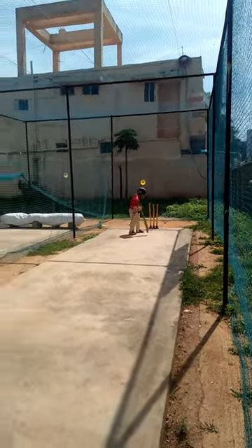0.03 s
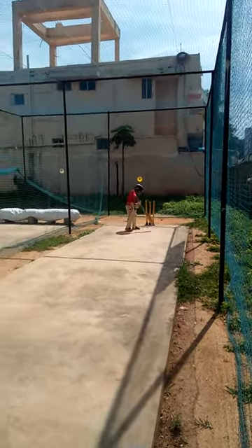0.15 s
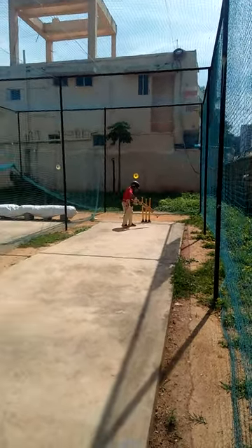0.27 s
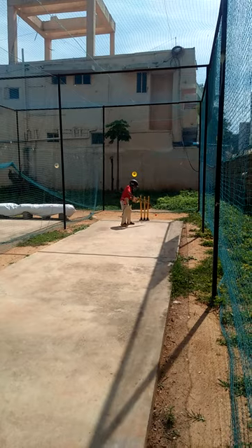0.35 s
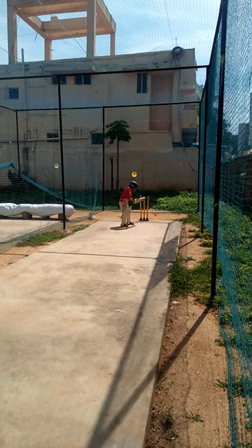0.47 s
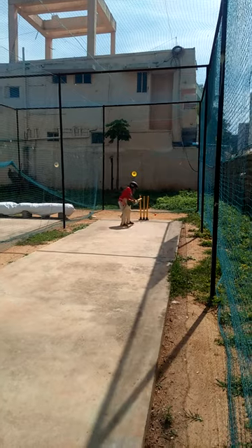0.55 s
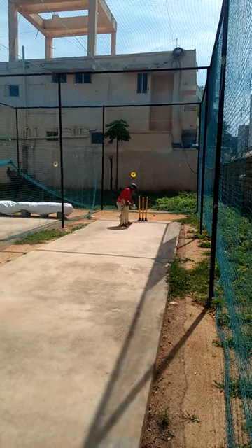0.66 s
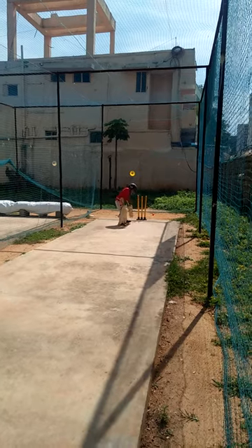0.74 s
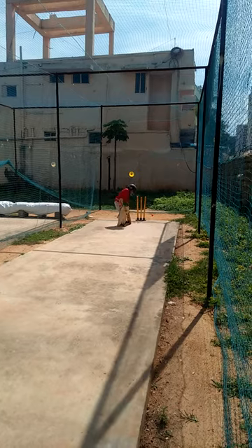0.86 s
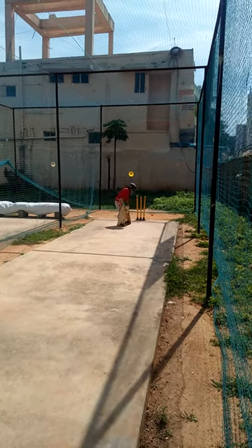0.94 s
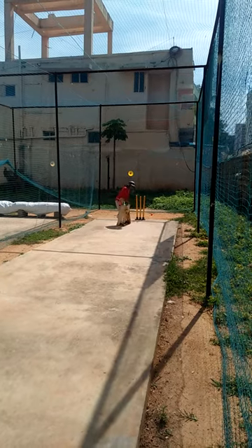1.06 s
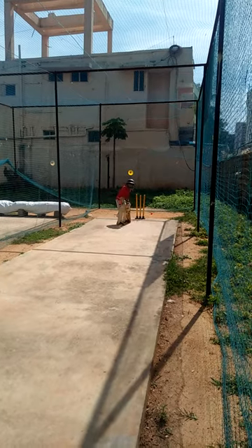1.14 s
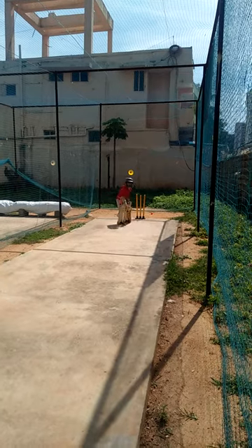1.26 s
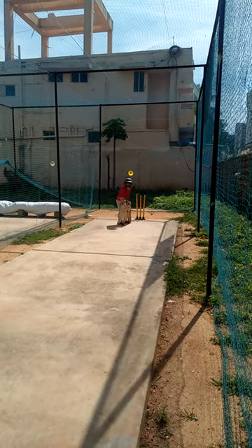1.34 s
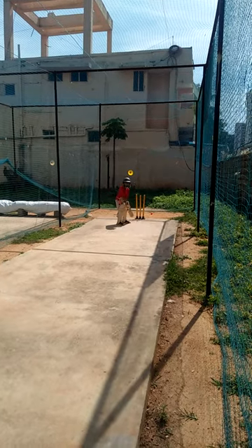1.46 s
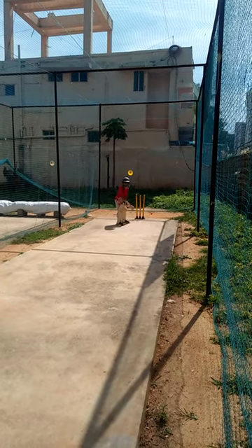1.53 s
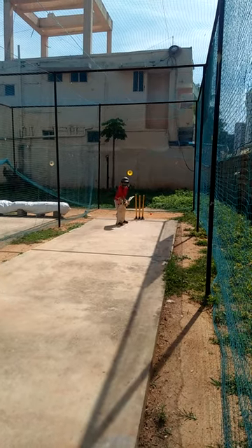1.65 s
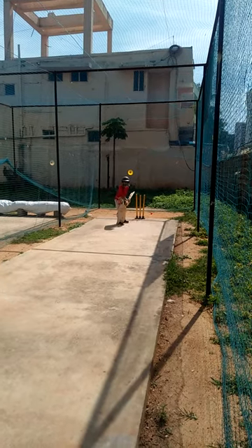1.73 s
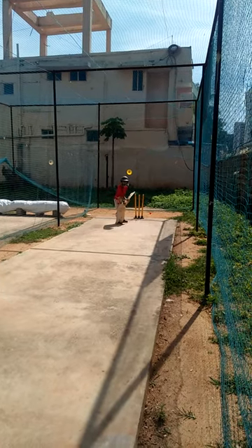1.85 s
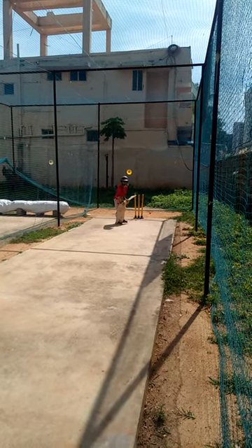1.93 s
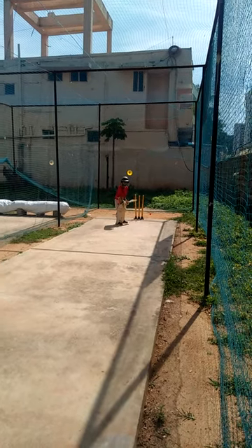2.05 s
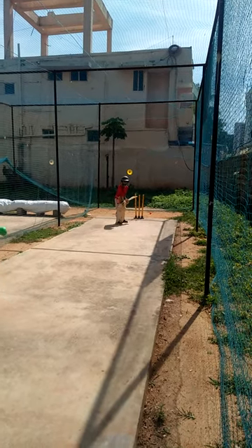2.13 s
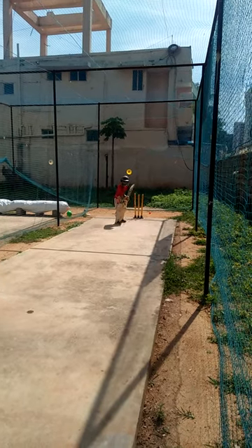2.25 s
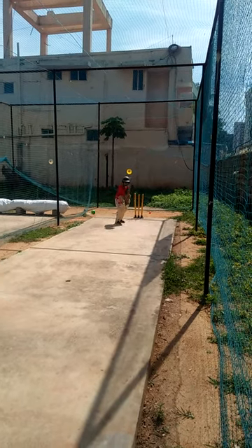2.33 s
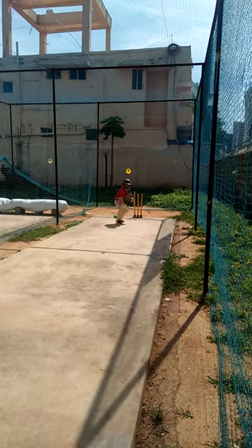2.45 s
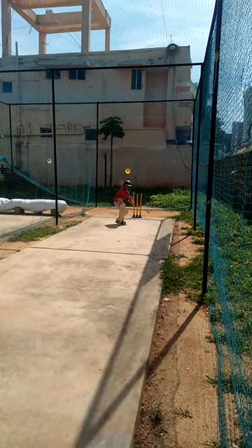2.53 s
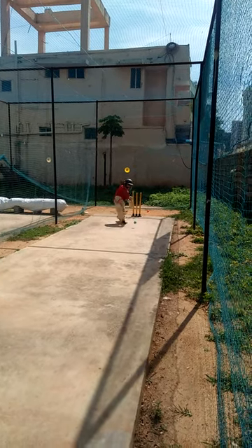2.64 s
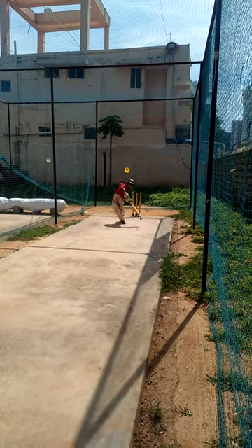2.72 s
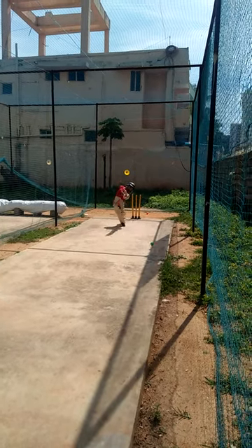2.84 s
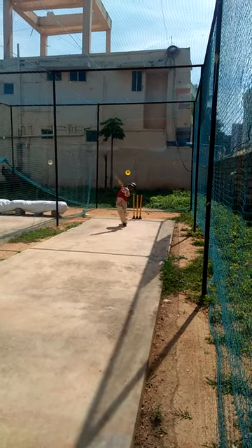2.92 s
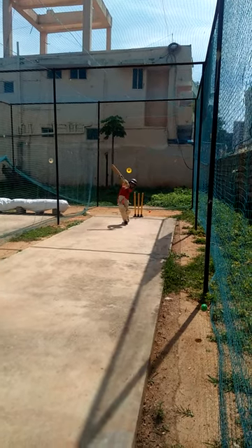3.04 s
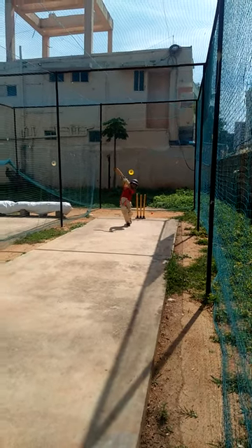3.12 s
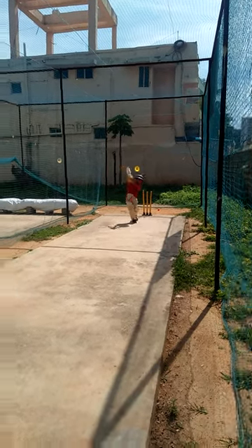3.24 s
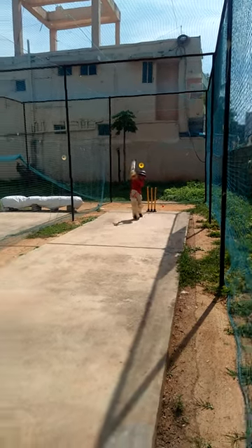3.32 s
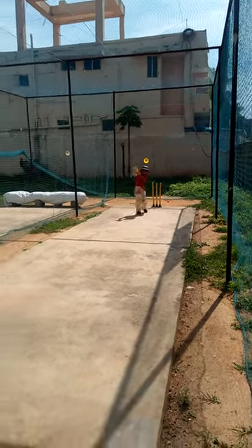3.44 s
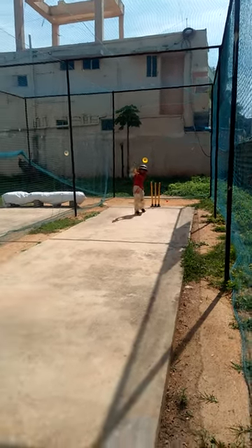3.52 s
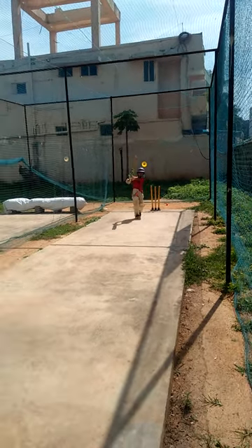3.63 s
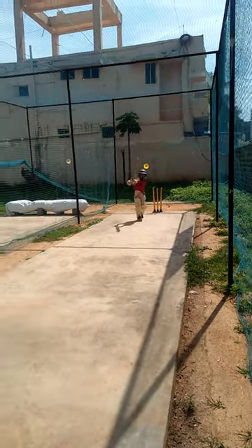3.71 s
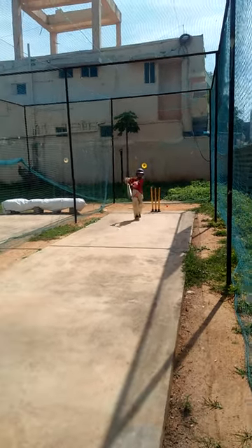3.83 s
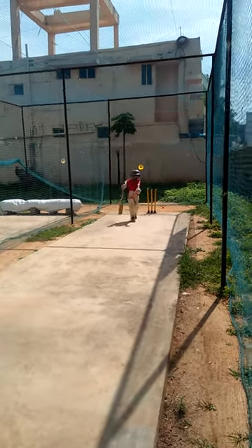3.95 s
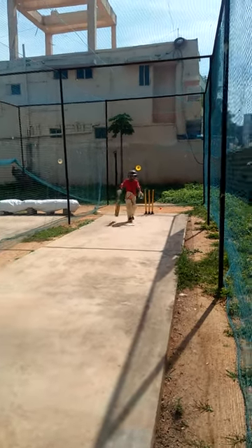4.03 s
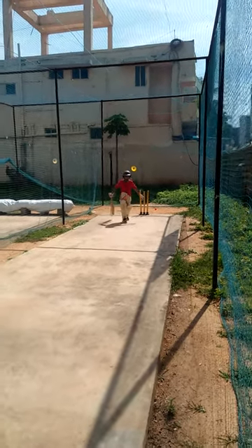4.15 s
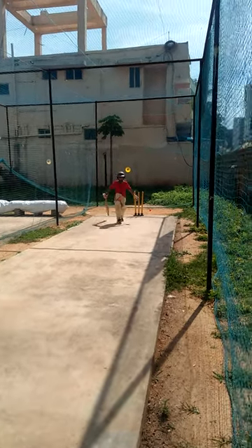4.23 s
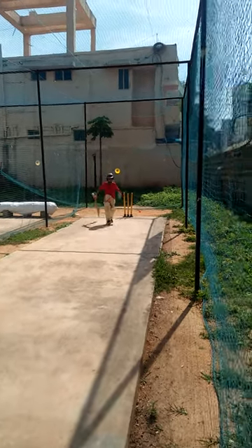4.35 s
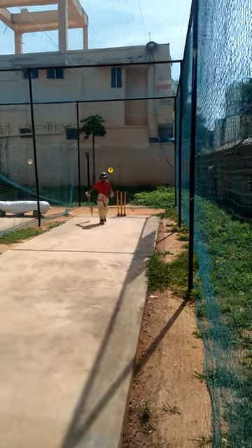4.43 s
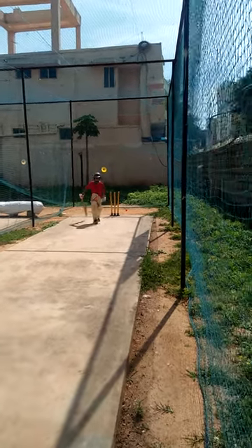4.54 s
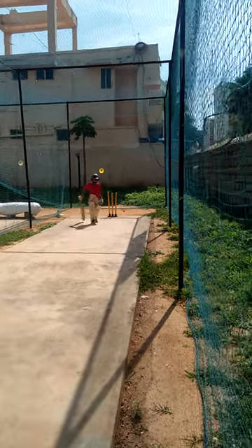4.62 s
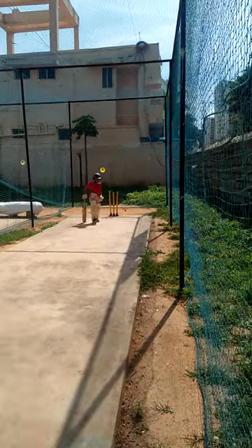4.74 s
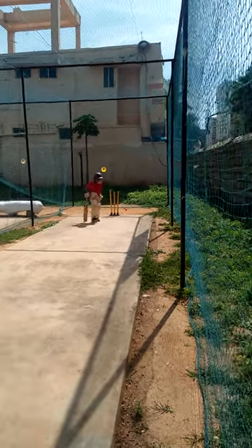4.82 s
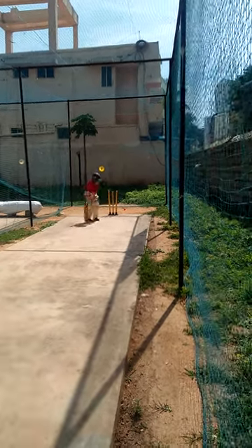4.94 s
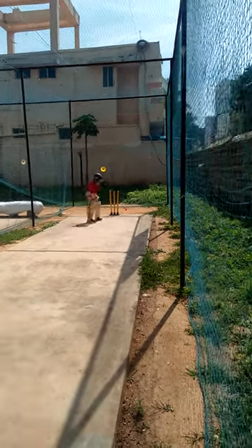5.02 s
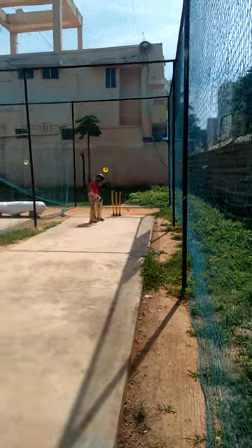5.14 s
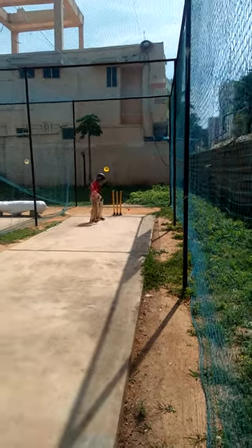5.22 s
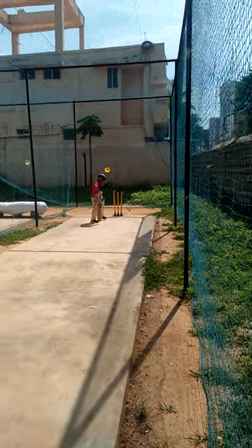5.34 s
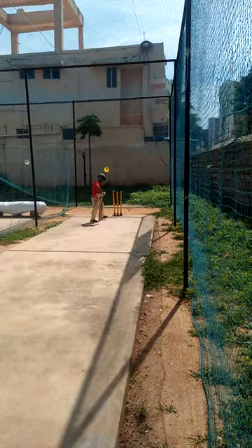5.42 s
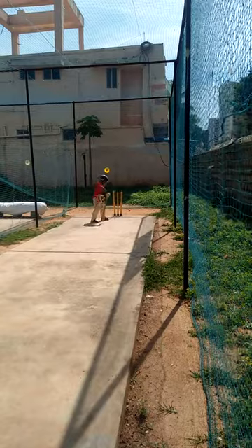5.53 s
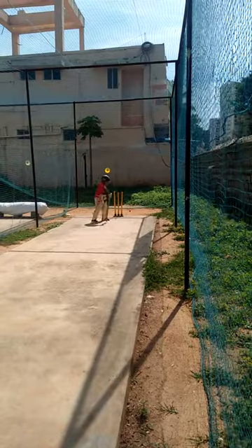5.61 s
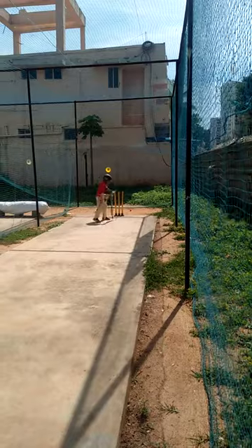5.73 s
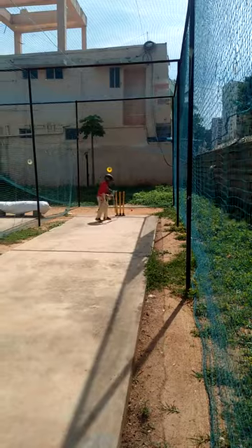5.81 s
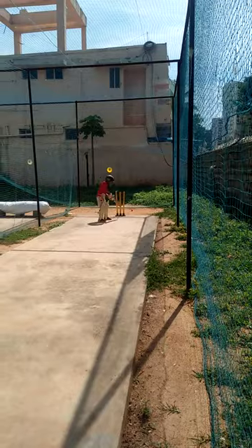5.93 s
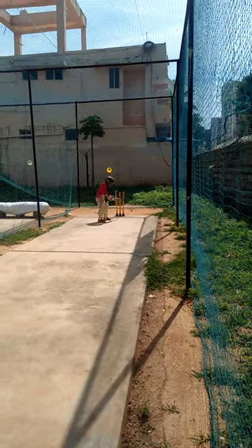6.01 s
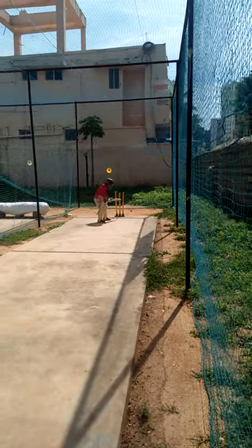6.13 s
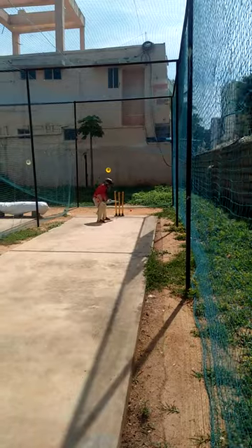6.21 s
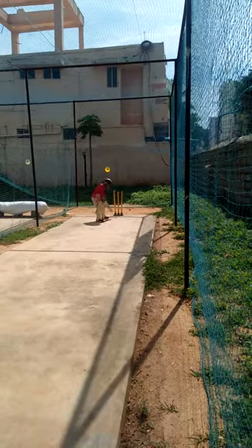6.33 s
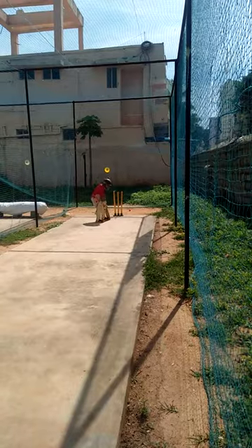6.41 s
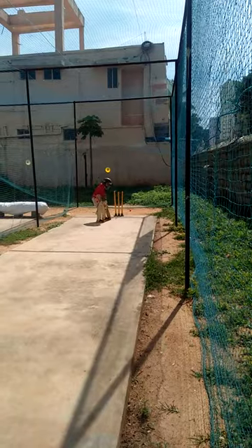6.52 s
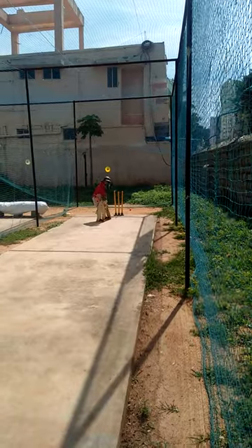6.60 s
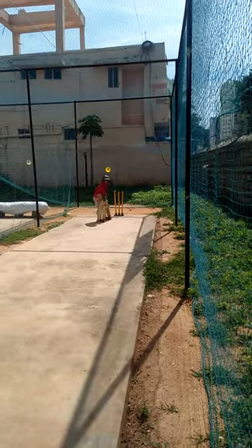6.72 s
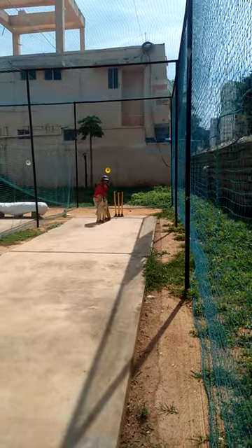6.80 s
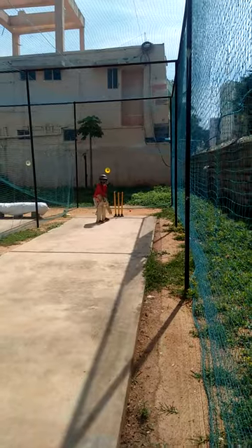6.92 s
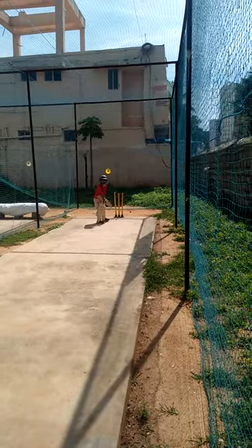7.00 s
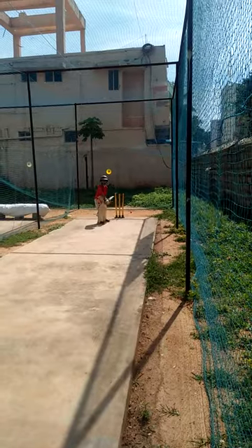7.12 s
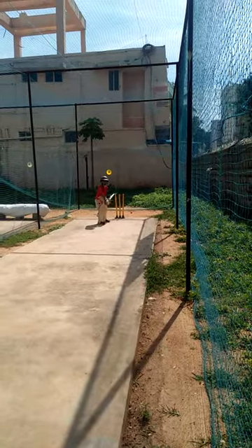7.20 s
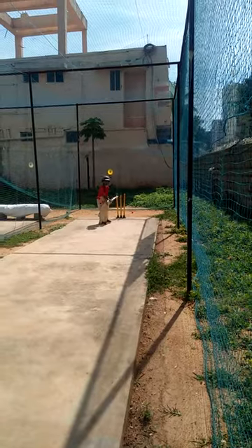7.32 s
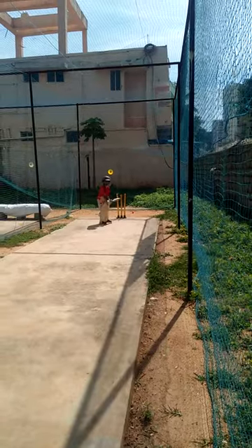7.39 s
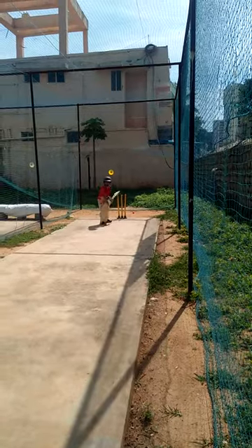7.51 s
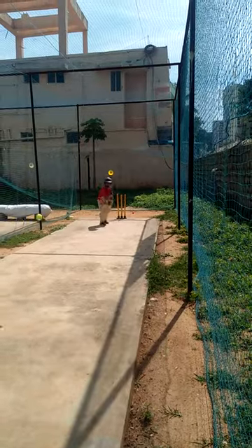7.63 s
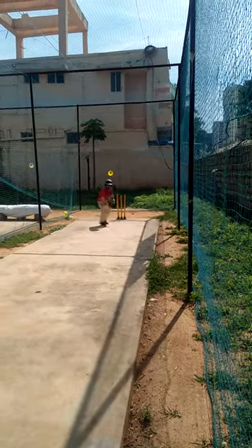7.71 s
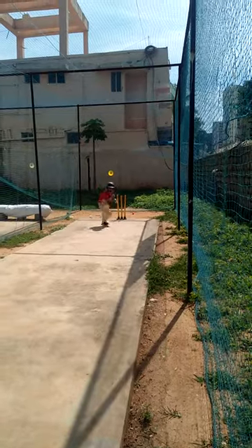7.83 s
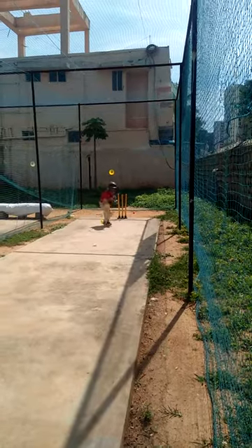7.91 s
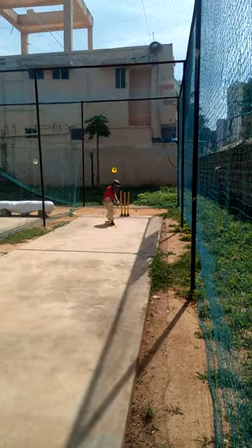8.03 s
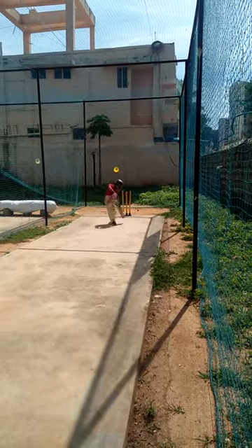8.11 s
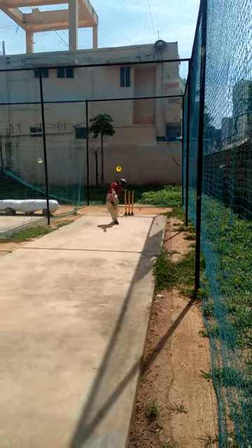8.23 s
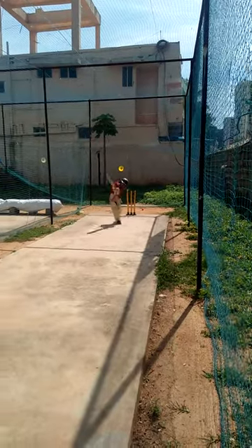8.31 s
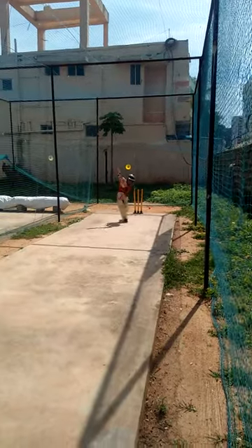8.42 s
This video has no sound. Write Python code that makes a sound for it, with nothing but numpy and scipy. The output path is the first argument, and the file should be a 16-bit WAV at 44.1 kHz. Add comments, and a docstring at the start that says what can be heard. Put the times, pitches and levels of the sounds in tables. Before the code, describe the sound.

Wooden bat taps and two sharp cricket shots on concrete, the first ball swishing into netting, while feet scuff grit and an insect chirps over faint town hum.

```python
"""Bat taps, shuffling feet and two sharp cricket shots on a concrete strip in an outdoor net, heard close to.
Each shot follows a ball that has just pitched; the first swishes into netting, which swings and ticks.
An insect chirps over the faint hum of the town. Bat, ball and small knocks are fading tones and noise bursts,
with echoes from nearby things and a house wall; feet, netting and town are coloured noise whose level
rises and falls; the insect is made of short falling tones."""
import sys
import numpy as np
from scipy import signal
from scipy.fft import rfft, irfft
from scipy.io import wavfile
from scipy.ndimage import uniform_filter1d

SR = 44100
rng = np.random.default_rng(int(sys.argv[2]) if len(sys.argv) > 2 else 0)


def put_to_file(sound):
    """Save the sound as 16-bit audio at rate SR, in the file named by the first command-line argument."""
    columns = np.atleast_2d(sound).T  # one column per channel
    safe = np.clip(columns, -1, 1)
    whole_steps = np.round(safe * 32767)
    wavfile.write(sys.argv[1], SR, whole_steps.astype(np.int16))


N = 373086

# bat blows, toe taps and shots: (time [s], level [dB], pitch that places the push's band [Hz],
# crack level [dB], scatter level [dB], wall echo setting, lowered again in yard() [dB])
BLOWS = [(0.964, -4.5, 716, -39.5, -16.5, -25), (2.8658, -2.5, 1380, -4, -3, -5),
         (6.557, -3.5, 800, -38, -14, -21.5), (8.2842, -6, 1310, -6, -4.5, -12)]
# colour of crunching grit: (frequency [Hz], relative level [dB])
GRIT = [(1500, -16), (3000, -11.5), (4500, -17), (5800, -9), (6800, 2.5), (8000, -2), (9600, 3.5),
        (11500, -5.5), (14000, -9.5)]
T = np.arange(N) / SR  # time through the scene (s)
AGE = T[:SR // 2]  # time since a short sound began (s)
# echo delays off the nearest surface, and off the house wall for the bat and for the ball's bounce (s)
CLOSE_S, WALL_S, BOUNCE_WALL_S = 0.0054, 0.0595, 0.065


def undb(db):
    """Turn decibels into a plain multiplier."""
    return 10 ** (np.asarray(db) / 20)


def unit(x):
    """Scale to an rms (average strength) of 1."""
    return x / np.sqrt(np.mean(x ** 2))


def add(track, s, sound):
    """Mix a sound into the track at s seconds."""
    start = max(int(s * SR), 0)
    part = track[start:start + len(sound)]
    part += sound[:len(part)]


def fade(t60):
    """Die away smoothly, falling by 60 dB in t60 seconds."""
    return np.exp(-np.log(1000) * AGE / t60)


def delay(x, s):
    """The same sound s seconds later."""
    silence = np.zeros(int(abs(s) * SR))
    return np.concatenate([silence, x])[:len(x)]


def cut(x, hz, kind, order=2):
    """Keep what lies below hz ("low") or above it ("high")."""
    sos = signal.butter(order, min(hz, SR / 2 - 1), kind, fs=SR, output="sos")
    return signal.sosfilt(sos, x)


def noise(spectrum, size=N):
    """Noise of rms 1 with the given colour."""
    hz, db = np.transpose(spectrum)
    f = np.maximum(np.fft.rfftfreq(size, 1 / SR), 1)
    colour = undb(np.interp(np.log(f), np.log(hz), db))
    return unit(irfft(rfft(rng.standard_normal(size)) * colour, size))


def walk(rate, size=N):
    """Smooth random wander of rms 1, with about rate new values a second."""
    k = max(int(SR / rate), 1)
    steps = np.repeat(rng.standard_normal(size // k + 1), k)
    return unit(uniform_filter1d(steps, k)[:size])


def ring(modes):
    """A struck object: fading pure tones added together, scaled to peak 1."""
    y = sum(undb(db) * np.sin(2 * np.pi * hz * AGE) * fade(t60) for hz, db, t60 in modes)
    return y / np.abs(y).max()


def crack(t60):
    """The brief bright burst of a hard contact: noise with a quick start and a fade."""
    # (frequency [Hz], relative level [dB])
    crack_colour = [(300, -10), (1600, 4.5), (2600, -7.5), (3700, -17), (4600, -5.5), (6200, -7.5),
                    (7400, -1.5), (9500, 0), (11000, -7.5), (13000, -11), (15000, -22)]
    return noise(crack_colour, size=len(AGE)) * fade(t60) * (1 - fade(0.0018))


def cloud(t60, top_hz):
    """A cluster of reflections of uneven strength, scaled by its fade time and duller above top_hz."""
    uneven = unit(undb(3.5 * walk(350, size=len(AGE))))
    y = cut(uneven * rng.standard_normal(len(AGE)), top_hz, "low", order=1) * fade(t60)
    return y / np.sqrt(SR * t60 / (2 * np.log(1000)))


def yard(x, scatter_db, wall_db, wall_s=WALL_S):
    """One close reflection, thin scatter from poles and ground, the house wall's slap and a faint tail."""
    near = undb(scatter_db) * delay(cloud(t60=0.1, top_hz=4940), 0.004)
    wall = undb(wall_db - 2) * delay(cloud(t60=0.06, top_hz=3500), wall_s)
    tail = undb(scatter_db - 6) * delay(cloud(t60=0.72, top_hz=2980), 0.02)
    scatter = cut(signal.fftconvolve(x, near + wall + tail)[:len(x)], 410, "high")
    slap = undb(wall_db - 6.5) * cut(delay(x, wall_s), 3880, "low", order=1)
    return x + undb(-8.5) * delay(x, CLOSE_S) + slap + scatter


def bat():
    """A toe tap is a slow push into the blade; the ball gives a quick push and a crack."""
    # the willow blade's tones: (frequency [Hz], relative level [dB], time to fade by 60 dB [s])
    blade_modes = [(611.4, -12.5, 0.097), (750, -17.5, 0.073), (863, 5, 0.008), (1030, -10, 0.041),
                   (1133, -12, 0.029), (1434, 0, 0.015), (1870, -18, 0.016)]
    out = np.zeros(N)
    for s, db, push_hz, crack_db, scatter_db, wall_db in BLOWS:
        body = cut(ring(blade_modes), 2.37 * push_hz, "low", order=4)
        body = cut(body, 0.8 * push_hz, "high", order=3)
        thump = undb(-28.5) * cut(ring([(175, 0, 0.028)]), 90, "high")  # the handle flexes
        sand = undb(-48.0) * noise(GRIT, size=len(AGE)) * fade(0.073)  # dust on the wood crunches
        wood = undb(db) * (body / np.abs(body).max() + thump)
        hit = wood + undb(crack_db) * crack(t60=0.0073) + sand
        add(out, s, yard(hit, scatter_db, wall_db))
        add(out, s - 0.0062, soft_onset(db - 14.0))
        # the wall echo also begins with a faint dull onset
        add(out, s + WALL_S - 0.007, undb(db - 26) * knock(387))
        # a hard shot carries a low thud
        low_thud = ring([(58, 0, 0.11), (140, -4, 0.08)])
        add(out, s, undb(crack_db - 38.5) * low_thud)
    return out


def ball():
    """The ball pitches on concrete: a hollow thud, a crack and a short rough ping that sags in pitch."""
    # (time [s], thud level [dB], crack level [dB], pitch the ping sags to [Hz],
    # ping setting before its fades [dB], scatter level [dB])
    bounces = [(2.7808, -27, -15.5, 4440, -13.5, -2), (8.1912, -19.5, -17.5, 4410, -26.5, -1),
               (8.3332, -32, -7, 5530, -25, -5)]
    # the ball's shell: (frequency [Hz], relative level [dB], time to fade by 60 dB [s])
    shell_modes = [(960, -3, 0.0073), (1440, 0.5, 0.017), (2002, -1, 0.0082)]
    out = np.zeros(N)
    for s, thud_db, crack_db, ping_hz, ping_db, scatter_db in bounces:
        roughness = 0.2 * rng.standard_normal(len(AGE))
        hz = ping_hz * (1 + 0.07 * fade(0.012) + roughness)
        tone = np.sin(2 * np.pi * np.cumsum(hz) / SR)
        ping = undb(ping_db) * tone * fade(0.022) * (1 - fade(0.006))
        hit = undb(thud_db) * ring(shell_modes) + undb(crack_db) * crack(t60=0.011)
        echoed = yard(hit + undb(-7.5) * ping, scatter_db, wall_db=-11, wall_s=BOUNCE_WALL_S)
        add(out, s, echoed + ping)
        # the hard wall returns the crack bright
        add(out, s + BOUNCE_WALL_S, undb(crack_db - 18) * tick())
        add(out, s - 0.0062, soft_onset(thud_db - 10.0))
    return out


def shuffling():
    """Each move of the feet swells and fades: the sole scrapes low, sand hisses high."""
    # steps and shuffles, plus the gritty hiss trailing the first tap (row at 1.02 s): (middle [s], half length
    # of the power swell [s], # grit hiss level [dB], sole scrape level before its catches [dB])
    scuffs = [(0.185, 0.033, -66, -87), (1.02, 0.088, -68.5, -56.5), (1.95, .13, -74.5, -72.5),
              (2.3, 0.049, -87, -55), (2.38, 0.063, -62.5, -57.5), (2.69, 0.029, -50, -72),
              (3.871, 0.013, -56.5, -55.5), (5.305, 0.074, -65, -55.5), (5.67, 0.044, -65, -59),
              (6.255, 0.032, -60.5, -74), (6.364, .056, -69, -68.5), (6.997, 0.037, -63.5, -56),
              (7.102, 0.023, -67, -53), (7.28, 0.018, -64.5, -68), (7.567, 0.025, -52, -62.5)]
    # colour of the scraping sole: (frequency [Hz], relative level [dB])
    sole_colour = [(150, -17.5), (350, -7.5), (520, -2), (850, -3.5), (1400, -15.5), (2500, -22),
                   (5000, -33.5)]
    # the feet turn after each blow, the more the harder it cracks
    pivot_lag_s, pivot_half_s = 0.112, 0.087
    pivot_grit_db, pivot_sole_db = -46, -64.5  # relative to the crack
    pivots = [(s + pivot_lag_s, pivot_half_s, crack_db + pivot_grit_db, crack_db + pivot_sole_db)
              for s, _, _, crack_db, _, _ in BLOWS]
    moves = list(scuffs) + pivots
    fidget = undb(-89.5 + 5 * walk(7.5))  # he never stands quite still
    grit_power = fidget ** 2 + sum(undb(db) ** 2 * swell(s, half) for s, half, db, _ in moves)
    sole_power = sum(undb(db) ** 2 * swell(s, half) for s, half, _, db in moves)
    grains = undb(3.1 * walk(700) + 2 * walk(48))
    catches = undb(2.2 * walk(90))
    hiss = np.sqrt(grit_power) * unit(grains * noise(GRIT))
    scrape = np.sqrt(sole_power) * catches * noise(sole_colour)
    return hiss + scrape


def netting():
    """The ball slides along the mesh, strand after strand, until it is taut; the mesh swings and goes slack."""
    # (frequency [Hz], relative level [dB])
    mesh_colour = [(1500, -38), (3600, -34), (4200, -32.5), (4650, -12), (5200, -22), (6000, -13.5),
                   (6500, -18), (7400, -5), (8300, -12.5), (9500, -4.5), (10800, -20), (12100, -13),
                   (13300, -17.5), (14300, -35.5)]
    hit_s, taut_s, slack_s = 3.219, 3.287, 3.745  # ball meets mesh, furthest stretch, mesh goes slack
    stretch_db, rise_db_per_s, fall_db_per_s = -26, 95, 223.5
    # the swish swells on every swing, around a level that falls away from the moment of full stretch
    swing_period_s, swing_db, swing_depth_db, swing_fall_db_per_s = 0.225, -48, 4.5, 24.5
    age = T - taut_s
    stretch = undb(stretch_db + np.minimum(rise_db_per_s * age, -fall_db_per_s * age))
    wave_db = swing_depth_db * np.cos(2 * np.pi * age / swing_period_s)
    level_db = swing_db - swing_fall_db_per_s * np.abs(age) + wave_db
    slack_db = fall_db_per_s * np.maximum(T - slack_s, 0)
    swing = undb(level_db - slack_db + 3.3 * walk(60))
    contact = np.clip((T - hit_s) / 0.002 + 1, 0, 1)  # silent until just before the hit
    strands = unit(noise(mesh_colour) * undb(1.6 * walk(400)))
    snags = unit(undb(2.2 * walk(180)))
    return strands * contact * np.hypot(stretch, swing * snags)


def ticks():
    """Grit snaps underfoot, the swinging mesh rattles and a loose tie ticks ever more softly, all short and dry."""
    # sharp snaps of grit and gear: (time [s], tick gain [dB], knock pitch [Hz], knock gain [dB])
    snaps = [(3.0357, -22, 5360, -23.5), (3.5595, -21.5, 2230, -36), (4.8816, -30, 454, -32),
             (5.2892, -30.5, 3030, -49), (5.339, -48, 766, -35)]
    # a loose tie ticks against its pole
    tie_s, tie_every_s, tie_hz = 3.9218, 0.1162, 5130
    tie_db, tie_loss_db = -34, 6  # gain of the first tick, and loss on each one after
    out = patter(start_s=3.45, end_s=3.55, level_db=-35, spread_db=0, count=4)  # the mesh, as it swings back
    out += patter(start_s=3.35, end_s=3.76, level_db=-48, spread_db=0, count=12)  # its strands
    # grit, as he walks back to the crease
    out += patter(start_s=3.9, end_s=6, level_db=-50.5, spread_db=-4, count=14)
    for s, tick_db, knock_hz, knock_db in snaps:
        add(out, s, undb(tick_db) * tick() + undb(knock_db) * knock(knock_hz))
    for k in range(4):
        tap = tick() + undb(-8.5) * knock(tie_hz)
        add(out, tie_s + k * tie_every_s, undb(tie_db - k * tie_loss_db) * tap)
    return yard(out, scatter_db=-12, wall_db=-27)


def next_net():
    """Another bat gives a short dry tock further off: ringing wood, a noisy clack and a faint crack."""
    # the other bat's tones: (frequency [Hz], relative level [dB], time to fade by 60 dB [s])
    far_modes = [(896, 1, 0.11), (1287, 14, 0.084), (1610, -10, 0.037), (1840, -20, 0.021),
                 (2100, -18, .025)]
    out = np.zeros(N)
    clack_colour = [(400, -33), (900, 0), (1500, 12.5), (2200, -2), (3500, -38)]
    clack = undb(-30.5) * noise(clack_colour, size=len(AGE)) * fade(0.045)
    soft_start = 1 - fade(0.0071)
    wood = cut((undb(-24.5) * ring(far_modes) + clack) * soft_start, 600, "high")
    tock = wood + undb(-40) * crack(t60=0.018)
    add(out, 5.6398, yard(tock, scatter_db=-15, wall_db=-32))
    return out


def insect(level_db=-62.5, rasp_db=-16):
    """Each chirp is two buzzy wing strokes that fall in pitch, with a faint rasp, smeared by the grass."""
    # the insect keeps a nearly even beat: (time [s], chirps so far [count])
    beat = [(-.028, 0), (1.24, 16), (2.08, 27), (4.1, 52), (4.93, 62), (8.506, 107)]
    wing_hz, wing_drop_hz = 7550, 1100  # start and fall of each stroke, before a small random shift
    stroke_s, stroke_gap_s, grass_t60_s = 0.015, 0.022, 0.055
    out = np.zeros(N)
    u = np.arange(int(stroke_s * SR)) / (stroke_s * SR)  # 0 to 1 through a stroke
    s, count = np.transpose(beat)
    for start in np.interp(np.arange(1, count[-1]), count, s):
        for lag, db in ((0, -3), (stroke_gap_s, 0)):
            hz = wing_hz - wing_drop_hz * u + 30 * rng.standard_normal()
            stroke = np.sqrt(np.abs(np.sin(np.pi * u))) * np.sin(2 * np.pi * np.cumsum(hz) / SR)
            add(out, start + lag, undb(db + 1.2 * rng.standard_normal()) * stroke)
    rasp_colour = [(4000, -26.5), (6200, -6.5), (8800, -1.5), (11500, -10.5), (14000, -7.5)]
    rasp = undb(rasp_db) * np.abs(out) * noise(rasp_colour)
    song = out * (0.55 + 0.24 * walk(700)) + rasp
    song = song + undb(-2) * delay(song, CLOSE_S)
    smear = signal.fftconvolve(song, cloud(t60=grass_t60_s, top_hz=12100))[:N]
    return undb(level_db) * (song + undb(1) * smear)


def town():
    """Distant traffic, a narrow wavering hum, and a little air moving low down, all from coloured noise."""
    # colour of the traffic: (frequency [Hz], relative level [dB])
    traffic_colour = [(20, -18), (55, -3.5), (110, 2), (190, -0.5), (240, -14.5), (300, -1.5), (380, -24.5),
                      (450, -4), (530, -11.5), (930, -3), (1200, -10), (1650, -6), (2050, -18.5),
                      (4000, -35.5), (6000, -33), (9000, -31.5), (14000, -41.5)]
    # course of the hum, lifted and wavered below: (time [s], level setting [dB])
    hum_course = [(0.0, -65.5), (1.74, -65), (2.15, -59.5), (2.64, -62.5), (3.01, -59), (3.3, -65),
                  (3.8, -65), (6.76, -63), (7.51, -65.5), (8.12, -62)]
    # soft low bumps of air, as swelling tones: (time [s], frequency [Hz], half length [s], level [dB])
    air_bumps = [(0.416, 67.4, 0.012, -37), (0.553, 60.6, 0.019, -41)]
    # one gust added to calm air: peak time, rise and fall (s), then both levels before the flutter (dB)
    gust_s, gust_rise_s, gust_fall_s, gust_db, calm_db = 0.48, 0.13, 0.83, -57, -69.5
    drift_db = 1.5 * walk(4)
    traffic = undb(-61.5 + drift_db) * noise(traffic_colour)
    hum_db = np.interp(T, *np.transpose(hum_course)) + 1.95 + 0.8 * walk(7.3)
    hum_colour = [(900, -44.5), (1380, -13.5), (1500, -4.0), (1570, 3.5), (1640, -4.5),
                  (1780, -19.5), (2400, -47.5)]
    hum = undb(hum_db) * noise(hum_colour)
    dying = np.exp(-np.abs(T - gust_s) / gust_fall_s)
    gust = np.where(T < gust_s, swell(gust_s, gust_rise_s), dying)
    flutter = undb(walk(14))
    air_colour = [(20, -18.5), (60, 3.5), (150, -5), (300, -13.5), (800, -57.5)]
    air = (undb(calm_db) + undb(gust_db) * gust) * flutter * noise(air_colour)
    bumps = sum(undb(db) * swell(s, half) * np.sin(2 * np.pi * hz * (T - s))
                for s, hz, half, db in air_bumps)
    return cut(traffic + hum + air, 30, "high") + bumps


def soft_onset(db):
    """A faint dull onset just before the blow; db is its gain before filtering."""
    return undb(db) * cut(cut(ring([(646.0, 0, 0.0053)]), 730, "low"), 250, "high")


def swell(s, half_s):
    """A bell-shaped rise and fall around s seconds, down to about a third at half_s either side."""
    return np.exp(-((T - s) / half_s) ** 2)


def knock(hz):
    """A small dry knock with a soft edge: a tone plus noise around it; low ones ring longer."""
    band = [(hz / 2, -24), (hz, 0), (hz * 2, -32), (hz * 4, -65)]
    edge = 1 - np.exp(-AGE * hz)
    tone = ring([(hz, 0, 11 / (hz + 300))])
    return edge * (tone + 0.5 * noise(band, size=len(AGE)) * fade(0.028))


def tick():
    """The treble of a tiny crack."""
    return cut(crack(t60=0.0099), 5500, "high", order=3)


def patter(start_s, end_s, level_db, spread_db, count):
    """Tiny ticks loosely spread over a stretch of time; their strength varies unless spread_db is 0."""
    out = np.zeros(N)
    for k, (place, strength) in enumerate(rng.random((count, 2))):
        s = start_s + (end_s - start_s) * (k + place) / count
        add(out, s, undb(level_db + spread_db * (2 * strength - 0.5)) * tick())
    return out


def scene():
    """Everything sits in the middle; only the top of the treble spreads sideways."""
    mid = bat() + ball() + shuffling() + netting() + ticks() + next_net() + insect() + town()
    wandering = cut(mid, 3000, "high", order=4) * walk(2000)
    side = undb(-9) * cut(wandering, 6200, "high", order=8)
    return np.array([mid + side, mid - side])


def record(dry):
    """Round off the highest peaks, then steeply cut the treble above top_hz."""
    top_hz = 14400
    treble_cut = signal.ellip(12, 0.2, 80, top_hz, fs=SR, output="sos")
    return signal.sosfilt(treble_cut, np.tanh(dry))


dry = scene()
out = record(dry)
put_to_file(out)
```